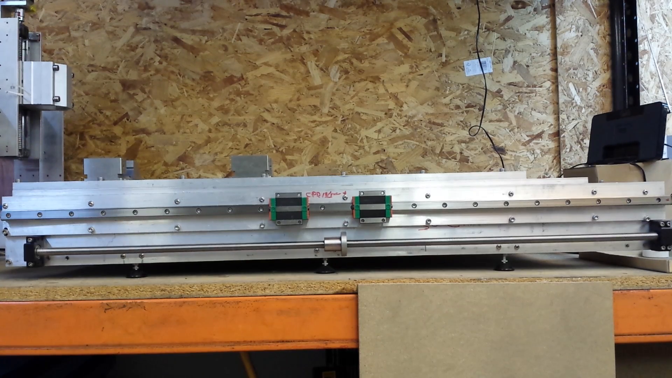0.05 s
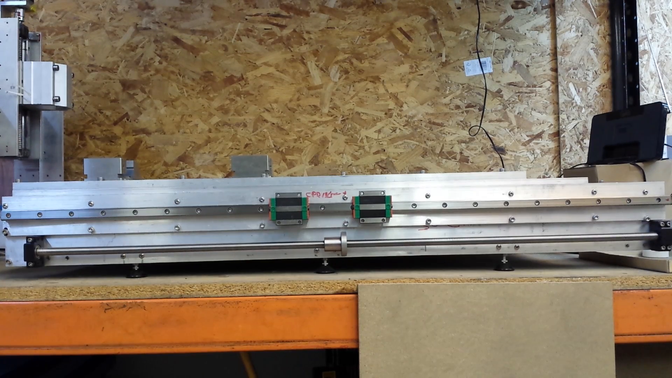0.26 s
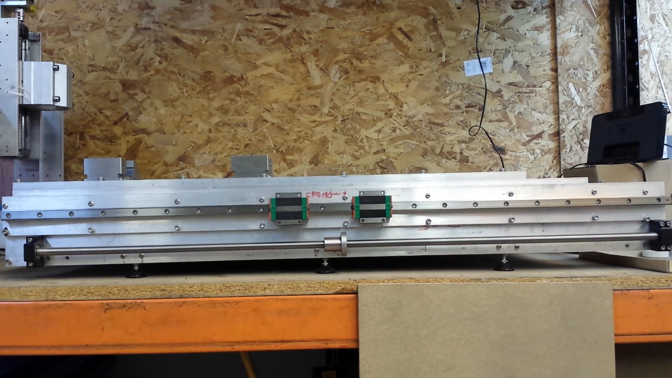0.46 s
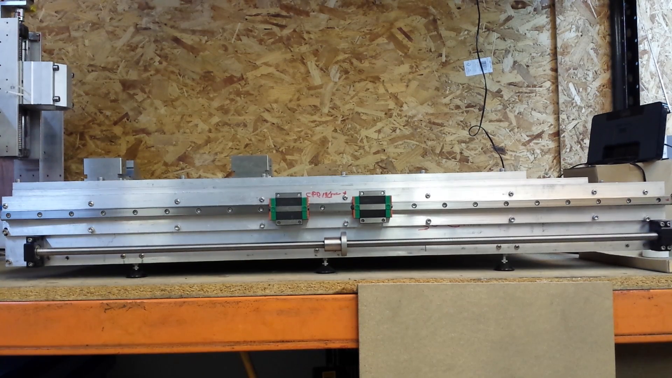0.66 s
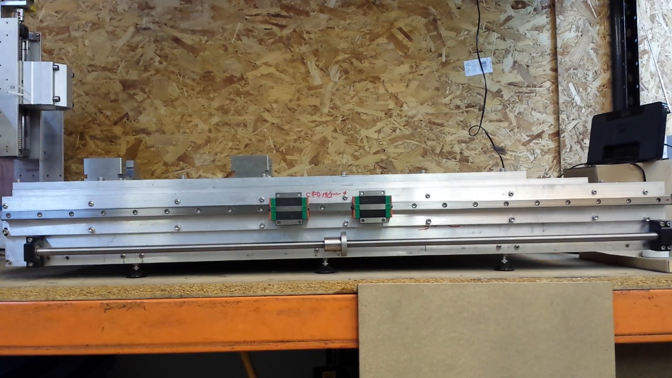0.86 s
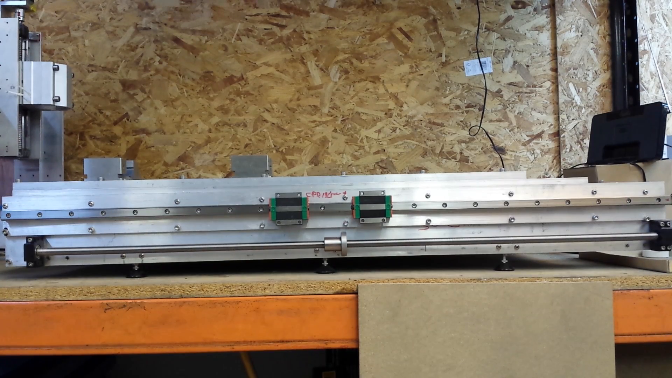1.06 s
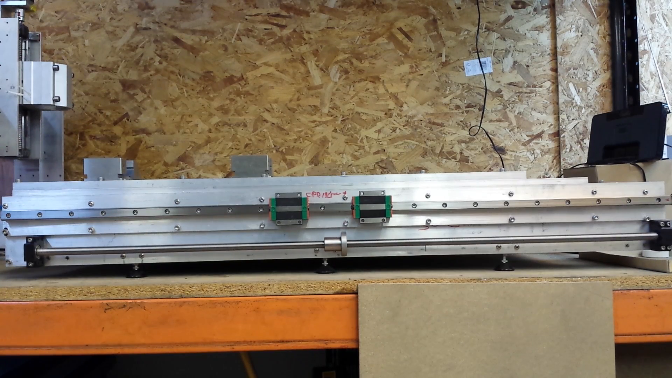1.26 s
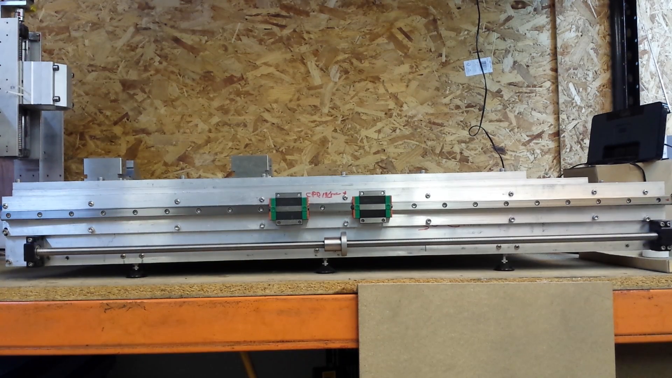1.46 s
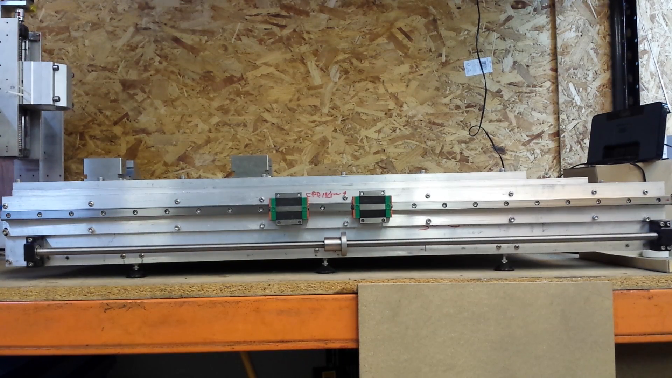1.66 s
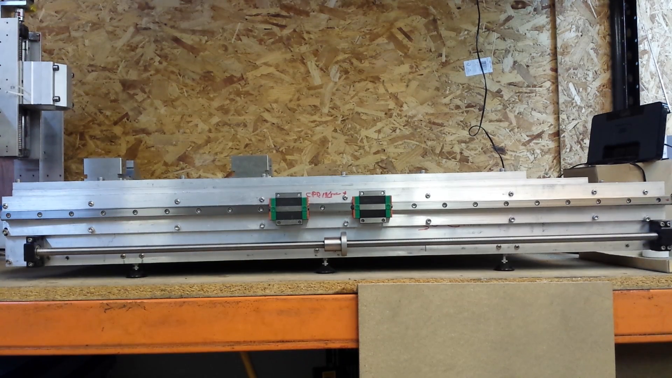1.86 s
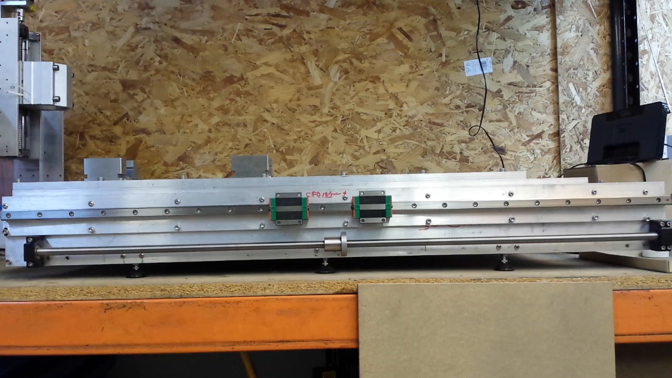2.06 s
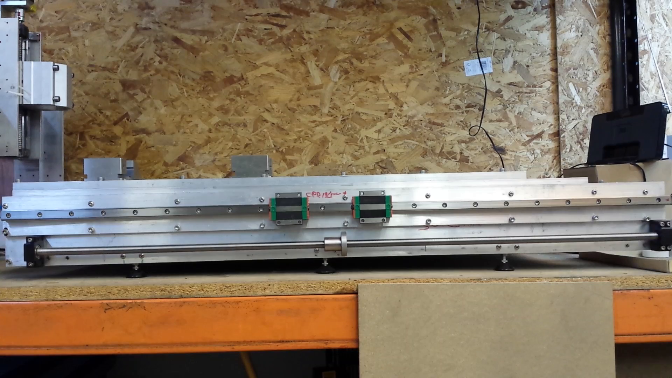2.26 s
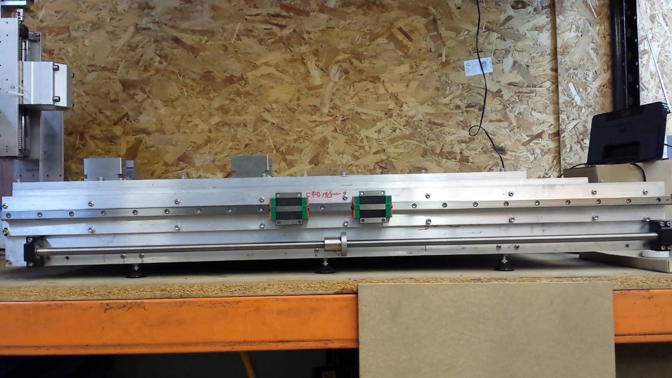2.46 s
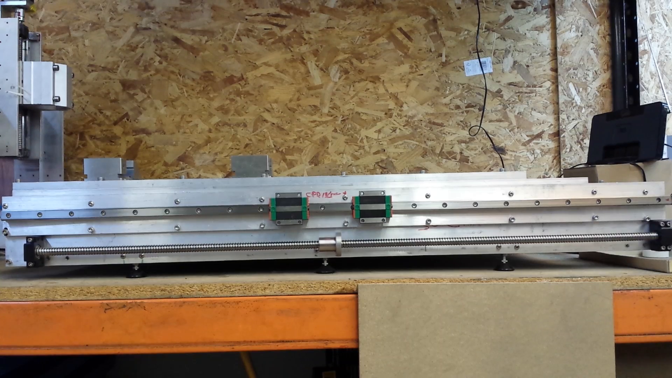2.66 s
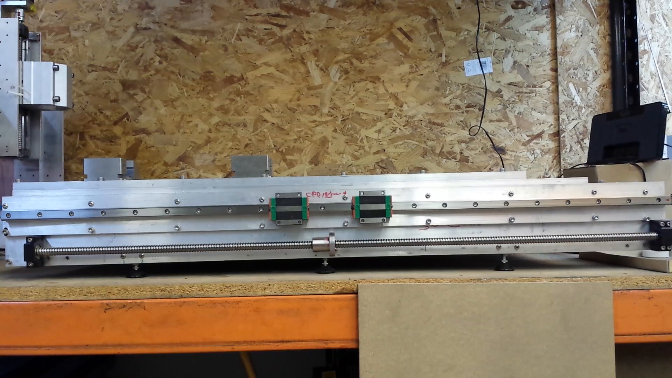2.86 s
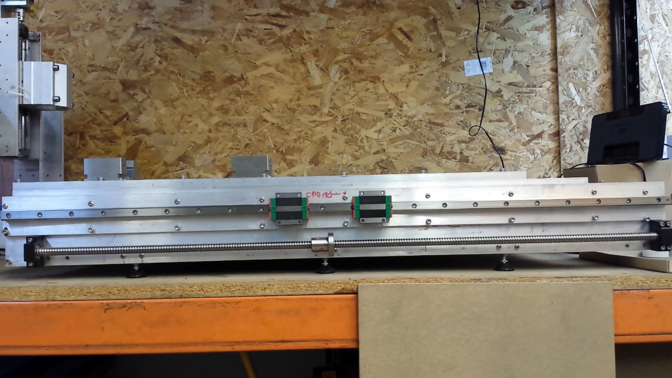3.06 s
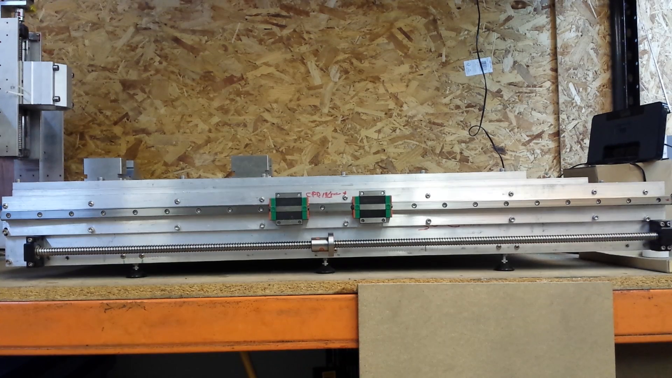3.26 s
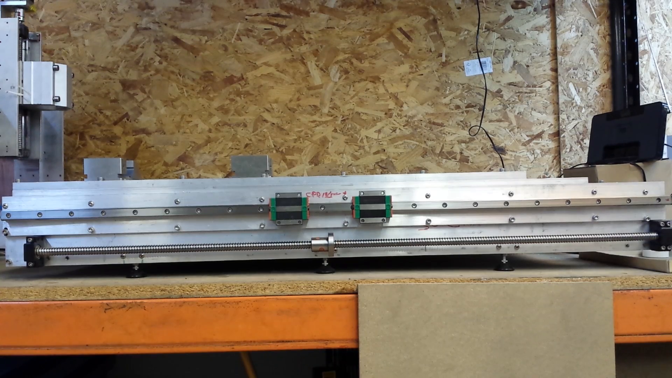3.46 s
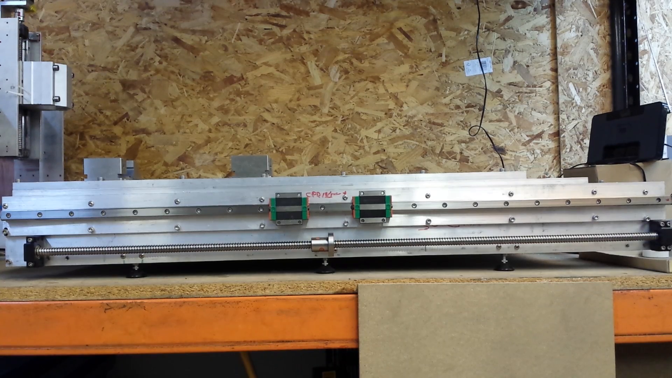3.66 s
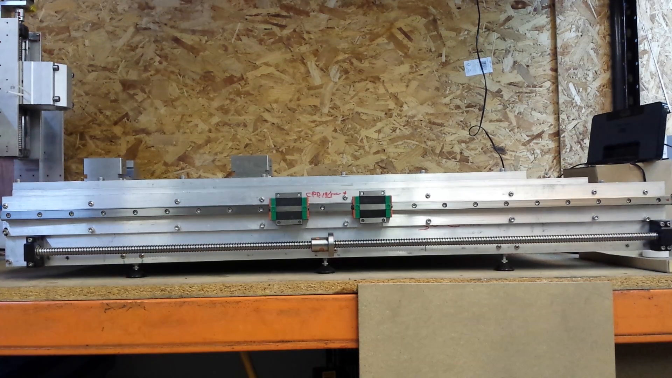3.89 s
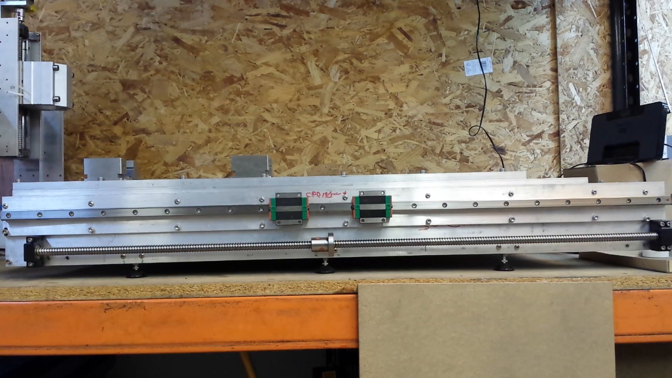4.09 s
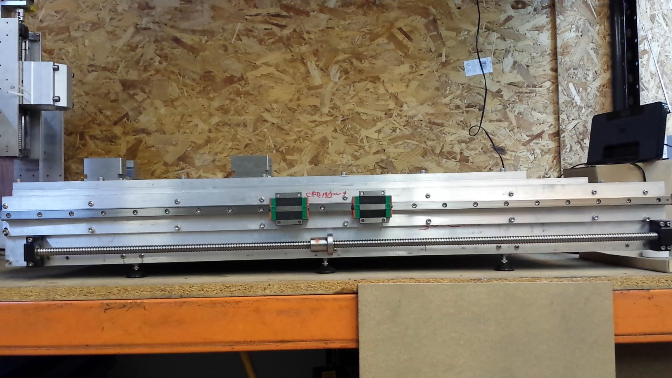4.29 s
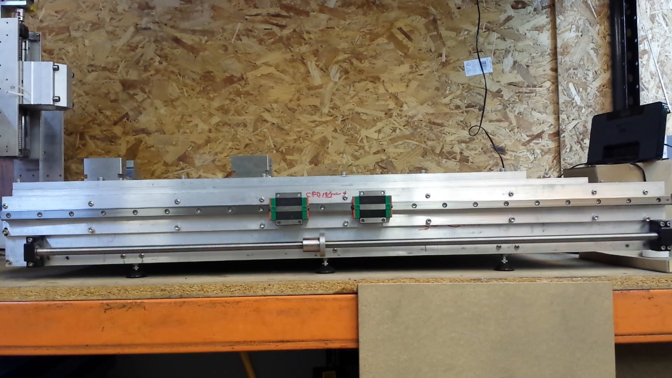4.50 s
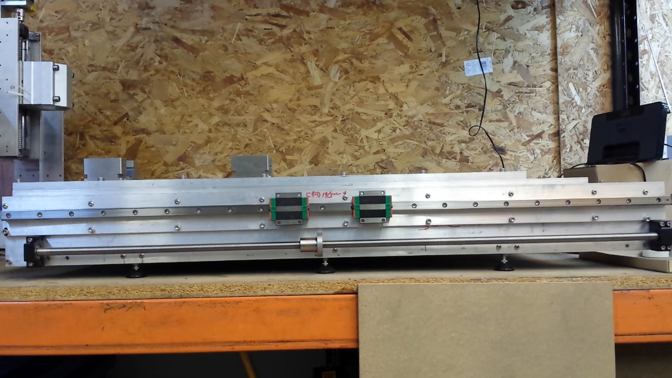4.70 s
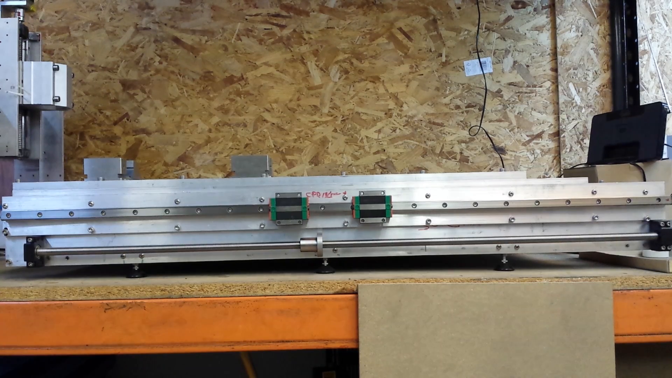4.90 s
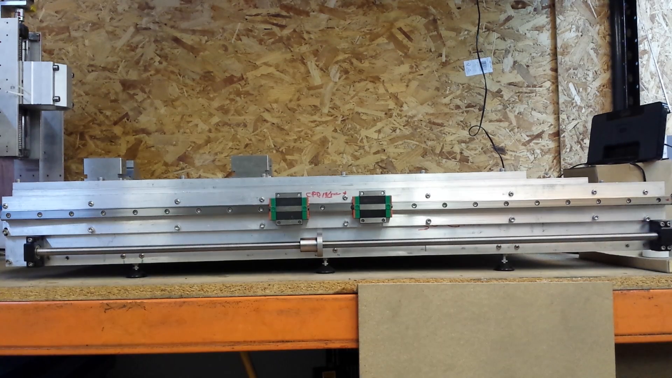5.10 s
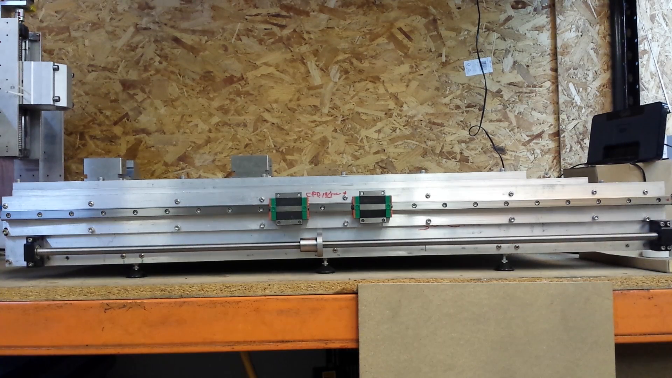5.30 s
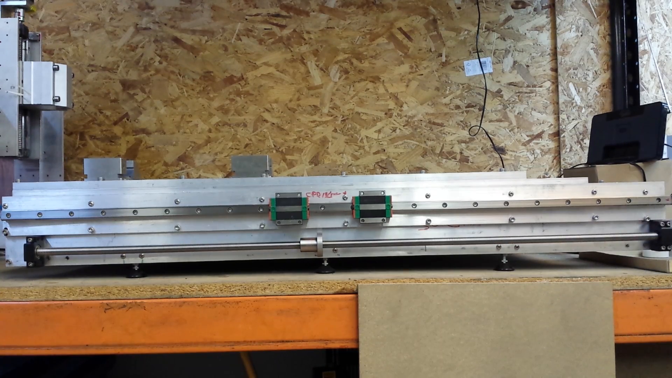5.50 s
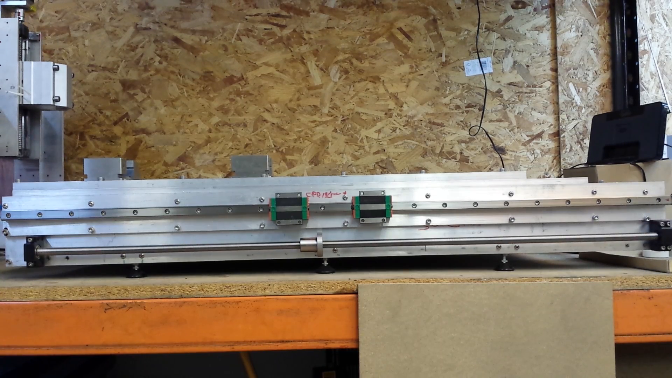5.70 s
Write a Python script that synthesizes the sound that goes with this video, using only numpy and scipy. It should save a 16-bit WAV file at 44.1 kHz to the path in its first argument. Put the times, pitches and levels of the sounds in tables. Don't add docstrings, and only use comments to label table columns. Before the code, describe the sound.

Close stereo sound of a stepper motor turning a long ball screw on an aluminium frame in a workshop. It begins already running, with a short opening jolt and unsettled wavering, then a steady whine around 1.7 and 3.4 kHz with fainter higher tones, a low screw hum, grainy metallic rumble and bearing hiss. Small knocks come near 0.33 and 0.6 s, with very faint regular coupling clicks. At 2.55 s it brakes: the pitch glides down fast through frame resonances, with a hard rattling jolt near 2.7 s and short ringing thuds until about 2.95 s. The rest holds only low shop noise, a faint boom and tiny ticks. At about 4.3 s it starts back with a stuttering shake, gliding up to full speed by 4.53 s. The whine wavers until about 4.86 s, stronger than before, then runs steadily with rumble and hiss to the end at about 5.75 s.

```python
import sys
import numpy as np
from scipy import signal
from scipy.fft import rfft, irfft, next_fast_len
from scipy.io import wavfile
from scipy.ndimage import uniform_filter1d

SR = 44100
rng = np.random.default_rng(int(sys.argv[2]) if len(sys.argv) > 2 else 0)


def ratio(d):
    e = np.asarray(d, float) / 20
    return 10 ** e


def to_wav(sig):
    pcm = np.clip(np.atleast_2d(sig), -1, 1) * 32767
    pcm = np.round(pcm).astype(np.int16)
    wavfile.write(sys.argv[1], SR, pcm.T)


N = 253164
T = np.arange(N) / SR

TURN_HZ = 33.528
REVERSE_S = 3.5


def in_time(rows):
    s, *columns = np.transpose(rows)
    return [np.interp(T, s, c) for c in columns]


def at_hz(points, hz):
    return np.interp(np.log(hz), np.log(np.array(points)[:, 0]), np.array(points)[:, 1])


def rms_one(x):
    return x / np.sqrt(np.mean(x ** 2) + 1e-20)


def resonate(x, hz, width):
    r = np.exp(-np.pi * width / SR)
    return signal.lfilter([1 - r], [1, -r * np.exp(2j * np.pi * hz / SR)], x)


def butter(x, order, hz, kind):
    return signal.sosfilt(signal.butter(order, hz, kind, fs=SR, output="sos"), x)


def swell_and_decay(late, db, rise, t60):
    return ratio(db + np.where(late < 0, 12 * late / rise, -60 * late / t60))


def banded_noise(spectrum, balance):
    # frequency in Hz, left-right likeness 0-1
    likeness = [(150, .99), (300, .92), (500, .8), (900, .4), (1500, .05), (14000, .01)]
    out = 0
    edges = 22 * 2 ** np.arange(0, 9.6, .5)
    sides = np.array([[1], [-1]])
    white = rng.standard_normal((2, 2, N))
    for k, (low, high) in enumerate(zip(edges, edges[1:])):
        mid, side = butter(white[k % 2], 2, [low, high], "band")
        hz = np.sqrt(low * high)
        alike = np.clip(at_hz(likeness, hz), 0, 1)
        pan = at_hz(balance, hz) / 2
        pair = np.sqrt(1 + alike) * mid + np.sqrt(1 - alike) * side * sides
        out = out + ratio(at_hz(spectrum, hz) + pan * sides) * pair
    return out


def shop_floor():
    # frequency in Hz, level in dB per Hz
    floor_spectrum = [(25, -19.5), (54, -18), (100, -9), (130, -15.5), (200, -13.5), (400, -26),
                      (600, -22.5), (800, -32), (1200, -19), (2000, -32), (2900, -38), (14000, -40.5)]
    # time in seconds, lift in dB
    floor_swell = [
        (0, 8.5),
        (3.3, 3),
        (3.6, -1),
        (3.9, -0.5),
        (4.2, 1.5),
        (4.5, 2.5),
    ]
    noise = rms_one(banded_noise(floor_spectrum, [(100, 3.5), (10000, -3.0)]))
    return ratio(-53 + in_time(floor_swell)[0]) * noise


def workshop(x):
    t60_s, wall_cut_hz = 0.87, 1060
    size = next_fast_len(N + SR)
    w = 2 * np.pi * np.arange(size // 2 + 1) / size
    t60 = t60_s / np.sqrt(1 + (w * SR / (2 * np.pi * wall_cut_hz)) ** 2)
    out = np.zeros((2, len(w)), complex)
    for k, lag in enumerate(rng.uniform(.02, .055, 16) * SR):
        loop = ratio(-60 * lag / SR / t60) * np.exp(-1j * w * lag)
        out[k % 2] += loop / (1 - loop) * (-1) ** (k // 2)
    return irfft(out * rfft(x, size), size)[:, :N]


def shaft_speed():
    # time in seconds, share of full speed
    speed_ramps = [
        (0, 1),
        (2.555, 1),
        (2.775, 0),
        (4.306, 0),
        (4.325, .08),
        (4.35, .15),
        (4.53, 1),
        (5.75, 1),
    ]
    return in_time(speed_ramps)[0]


def shaft_angle():
    # start in seconds, end in seconds, swing in rad at the full-step rate, power of the arch
    hunts = [
        (-.3, .27, 2.7, 1),
        (4.52, 4.86, 1.9, .5),
    ]
    hunt_hz = 69
    swing = 0
    for start, end, rad, power in hunts:
        through = np.clip((T - start) / (end - start), 0, 1)
        swing = swing + rad * np.abs(np.sin(np.pi * through)) ** power
    wander = .35 * rms_one(resonate(rng.standard_normal(N), 0, 40.0).real)
    angle = 2 * np.pi * TURN_HZ * np.cumsum(shaft_speed()) / SR
    return angle, swing / 200 * np.sin(2 * np.pi * hunt_hz * T + wander)


def rolling():
    return shaft_speed() ** (2 * 1.9)


def jolts():
    # peak in seconds, level in dB, rise in seconds, t60 in seconds
    jolt_rows = [(0.001, -6, .01, 1.04), (.34, -13.5, 0.024, 0.29), (0.598, -11, 0.021, 0.44),
                 (2.651, -4, 0.065, 0.31), (2.72, 5.5, 0.04, 0.85), (2.858, -1.5, 0.056, 0.4),
                 (3.0, -31, .1, 0.73), (4.36, -19, 0.0059, 1.6), (4.45, -5.5, 0.06, 0.59),
                 (4.528, 1, 0.092, 0.45), (4.629, -5, 0.027, 0.78)]
    return sum(swell_and_decay(T - s, db, rise, t60) ** 2 for s, db, rise, t60 in jolt_rows)


def bench_boom():
    # middle in seconds, level in dB, half length in seconds, pitch in Hz, width in Hz
    booms = [
        (3.15, -51, 0.21, 95, 24),
        (4.12, -54, 0.27, 98, 18),
        (5.62, -44.5, 0.14, 80, 55),
    ]
    wander_db = -3 * rms_one(resonate(rng.standard_normal(N), 0, 6.6).real)
    power = ratio(2 * (-55.5 + wander_db)) * shaft_speed()
    white = rng.standard_normal(N)
    out = np.sqrt(power) * rms_one(butter(white, 4, [56, 130], "band"))
    for s, db, half, hz, width in booms:
        band = rms_one(butter(white, 2, [hz - width / 2, hz + width / 2], "band"))
        out += ratio(db) * np.exp(-((T - s) / half) ** 2 / 2) * band
    return out


def dipped(hiss):
    # pitch in Hz, width in Hz, depth 0-1 on the way out, depth 0-1 on the way back
    dips = [(5780, 350, .6, .5), (7700, 900, .5, .5), (8900, 500, 0, .5), (9550, 350, .6, .6),
            (10300, 500, 0, .4), (11200, 600, .65, .85), (11750, 300, .4, .5)]
    speed = shaft_speed()
    for hz, width, out, back in dips:
        depth = speed * np.where(T > REVERSE_S, back, out)
        hiss = hiss - depth * signal.lfilter(*signal.iirpeak(hz, hz / width, fs=SR), hiss)
    return hiss


def bearing_hiss(jolt):
    # frequency in Hz, level in dB per Hz
    hiss_spectrum = [(150, -4), (300, 9), (800, 6), (1500, 11.5), (2800, 3.5), (4200, 4), (5600, 6),
                     (7600, 3), (10000, -4.5), (12600, -9), (14500, -11.5)]
    # frequency in Hz, left-right balance in dB
    hiss_balance = [(200, 1), (2200, -14.5), (5000, 4.5), (9000, -14.5), (13000, -26)]
    speed_db, jolt_db, still_share = -51.5, -42, 0.33
    power = ratio(2 * speed_db) * rolling() + ratio(2 * jolt_db) * jolt * (still_share + shaft_speed())
    hiss = np.sqrt(power) * banded_noise(hiss_spectrum, hiss_balance)
    return butter(dipped(hiss), 6, 13000, "low")


def whistles():
    # pitch in Hz, left level in dB, right level in dB
    whistle_rows = [(5968, -64, -71), (6804, -67, -76), (7100, -74, -73), (7550, -74, -80),
                    (7644, -73, -67), (7745, -73, -76), (9320, -77, -75), (11391, -73, -83),
                    (11488, -84, -70), (12150, -80, -73), (12380, -81, -73), (12672, -80, -66),
                    (14099, -92, -81)]
    out = np.zeros((2, N))
    white = rng.standard_normal(N)
    for hz, left_db, right_db in whistle_rows:
        whistle = rms_one(resonate(resonate(white, hz, 12), hz, 12).real)
        out += ratio(np.array([[left_db], [right_db]])) * whistle
    return out * shaft_speed() ** 20


def ticks():
    # start in seconds, level in dB, pitch in Hz, t60 in seconds
    tick_rows = [(0.331, -31, 1200, 0.15), (.597, -32, 1150, 0.18), (.596, -38, 2500, .12),
                 (.335, -31.5, 2200, 0.23), (2.647, -34, 8300, 0.043), (2.716, -25, 4900, 0.035),
                 (2.718, -20.5, 2800, 0.084), (2.757, -44, 8000, .03), (2.774, -33.5, 8900, 0.071),
                 (2.858, -29, 1200, 0.045), (3.04, -50, 6520, 0.047), (3.26, -51, 6300, 0.035),
                 (3.8, -47, 5700, 0.0056), (3.7, -64, 6500, 0.025), (4.038, -53, 6300, .03),
                 (.18, -36, 1700, .04), (2.735, -26, 3700, 0.044), (2.682, -32, 8900, .04)]
    length = 4000
    out = np.zeros(N)
    for s, db, hz, t60 in tick_rows:
        burst = rng.standard_normal(length) * ratio(-60 * np.arange(length) / SR / t60)
        width = .45 * hz if hz > 1000 else 70
        burst = resonate(resonate(burst, hz, width), hz, width).real * np.hanning(2 * length)[length:]
        out[int(s * SR):int(s * SR) + length] += ratio(db) * burst / np.abs(burst).max()
    return out * ratio(np.array([[-2.5], [2.5]]))


def coupling_tick(angle, tick_db, again_db):
    clicks = np.zeros(N)
    for offset, db in ((.32, tick_db), (.72, again_db)):
        at = np.flatnonzero(np.diff(np.floor(angle / (2 * np.pi) - offset)) > 0)
        at = at[at < 2.57 * SR]
        clicks[at] = ratio(db + rng.normal(0, 1.8, len(at)))
    ring = sum(resonate(clicks, hz, 380.0).real for hz in (8700, 9500, 10700))
    return rms_one(ring) * ratio(tick_db) * ratio(np.array([[-3.0], [1.5]]))


def rings():
    # peak in seconds, level in dB, pitch in Hz, rise in seconds, t60 in seconds
    ring_rows = [(.008, -30.5, 606, 0.033, 0.04), (.015, -35, 414, .02, 0.23),
                 (2.697, -32, 2280, .008, 0.089), (2.704, -35, 1140, .008, .1),
                 (2.72, -22, 595, 0.044, 0.089), (2.714, -26, 1740, .012, .07),
                 (2.79, -29.5, 906, .02, 0.2), (2.722, -26, 1535, 0.011, 0.08),
                 (2.726, -23.5, 1118, .014, 0.15), (2.735, -30, 480, 0.01, 0.1),
                 (2.757, -35, 1110, .008, .08), (2.77, -24.5, 602, 0.014, 0.092),
                 (2.78, -30, 190, 0.014, 0.072), (2.806, -31, 192, .01, .08), (2.846, -32, 199, .012, 0.07),
                 (2.93, -36, 201, .012, .08), (2.958, -35, 190, .012, .08), (2.812, -31, 1177, .01, 0.14),
                 (2.862, -30, 1180, .012, 0.11), (2.866, -26, 466, 0.017, 0.075),
                 (2.889, -41, 604, 0.011, 0.081), (2.897, -31, 1183, 0.011, 0.14),
                 (4.334, -31.5, 589.3, 0.0066, 0.5), (4.329, -37, 200, .006, .08),
                 (4.353, -32.5, 240, .008, 0.054), (4.375, -29, 240, 0.0074, 0.063),
                 (4.392, -37, 218, .007, .06), (4.412, -32, 230, 0.0068, .07),
                 (4.437, -30, 199, 0.015, 0.074), (4.45, -31, 630, .01, .06),
                 (4.555, -28, 507, 0.0085, .06), (4.363, -37, 1073, .012, 0.17),
                 (4.41, -18, 598, 0.0089, 0.061), (4.462, -21.5, 1125, 0.007, 0.09),
                 (4.5, -27.5, 1147, .03, .12), (4.496, -29.5, 600, 0.015, 0.18),
                 (4.534, -24.5, 1130, .008, .08), (4.534, -38, 600, 0.0089, 0.087),
                 (4.566, -27.5, 1750, .02, 0.11), (5.265, -33.5, 600, 0.082, 0.22)]
    out = np.zeros((2, N))
    for s, db, hz, rise, t60 in ring_rows:
        span = slice(max(int((s - 4 * rise) * SR), 0), int((s + t60) * SR))
        late = T[span] - s
        phase = rng.uniform(0, 2 * np.pi) + np.array([[.5 * (hz > 900)], [0]])
        out[:, span] += swell_and_decay(late, db, rise, t60) * np.cos(2 * np.pi * hz * late + phase)
    return out


def tooth_ripple(angle, rough_db, jitter_rad):
    # start in seconds, end in seconds, fade in and fade out in seconds, unevenness factor
    ramps = [
        (2.55, 2.802, 0.023, 0.087, 1.1),
        (4.318, 4.534, 0.03, 0.022, .75),
    ]
    ripple_orders = (50, 100, 150, 200, 250, 300)
    # braking dB and starting dB into the frame, braking dB and starting dB to the air
    ripple_levels = [(33, 34, -35, -36), (26, 25, -42, -41), (19, 18, -43, -46), (24, 37, -46, -41),
                     (8, -5, -56, -70), (0, -5, -63, -70)]
    # delay in seconds, share
    echoes = [(0, .8), (.0057, .5), (.0113, -.42), (.0181, .33), (.027, -.25), (.038, .18)]
    share = sum(np.clip(np.minimum((T - start) / rise, (end - T) / fall), 0, 1)
                for start, end, rise, fall, _ in ramps)
    busy = share > 0
    starting = T[busy] > REVERSE_S
    unevenness = np.where(starting, ramps[1][-1], ramps[0][-1])
    shake, air = np.zeros((2, N))
    for k, (brake_db, start_db, brake_air_db, start_air_db) in zip(ripple_orders, ripple_levels):
        slow = resonate(resonate(rng.standard_normal((2, busy.sum())), 0, 230), 0, 230).real
        uneven = unevenness * rms_one(slow)
        wave = share[busy] * ratio(rough_db * uneven[0]) * np.cos(k * angle[busy] + jitter_rad * uneven[1])
        shake[busy] += ratio(np.where(starting, start_db, brake_db)) * wave
        air[busy] += ratio(np.where(starting, start_air_db, brake_air_db)) * wave
    air = sum(part * np.roll(air, int(late * SR)) for late, part in echoes)
    stiff = butter(np.array([shake, air]), 3, 530, "high")
    return butter(stiff, 2, [480, 1040], "bandstop")


def frame(jolt, shake):
    # pitch in Hz, width in Hz, level in dB per Hz on the way out,
    # on the way back and when shaken, right-left level in dB, left lead in rad
    bench_modes = [(92.6, 8, -61.5, -67, -58, 0, 6), (152.8, 14, -69.5, -62, -60.5, -0.5, 3),
                   (192.1, 10.5, -62.5, -61.5, -56.5, -0.5, -1), (348, 72, -70.5, -67.5, -64.5, -3, 0),
                   (454.3, 44, -76, -67, -55.5, -2.5, 0.04), (491.4, 22.6, -64.5, -75, -58, 0, -0.5),
                   (591, 25.3, -60, -61, -54, 0, -0.4), (685.7, 38, -68, -82, -56, -2, 0.5),
                   (926, 57, -73.5, -77.5, -59.5, -4, -0.7), (1071, 36, -74.5, -81, -61, 5, 0.5),
                   (1119.4, 40, -68, -72, -57, -2.5, 0.5), (1198, 66, -68, -76, -58.5, -5.5, -1)]
    frame_modes = [(1282, 9.7, -58, -52, -58.5, -0.5, -1.63), (1377, 79, -70.5, -68, -65, 0.5, -1.04),
                   (1545, 42.5, -57.5, -52, -59.5, -2.5, 2), (1672, 26, -58.5, -82, -79, -6.5, 5),
                   (1731.7, 18.5, -51, -47, -75, -6, 1.4), (1763, 48, -58.5, -56, -61, -26, -7),
                   (1859, 38, -68.5, -67, -69.5, 5, 1), (2047, 126, -72, -72.5, -66, 1, 1.65),
                   (2209, 19.6, -65, -66, -56.5, -18, 1.2), (2330, 81, -78, -78, -67, -5.5, 0.2),
                   (2504, 107, -71, -75.5, -62.5, -4.5, 1.5), (2734, 270, -77.5, -78, -70, -22, 5.5),
                   (3304, 285, -71.5, -69, -67.5, 0, 2.5), (3860, 200, -85, -95, -72.5, -4, 1.5)]
    screw_mode = (258, 63, -77, -74.5, -61.5, -2.5, 1.5)
    roll_out_db, roll_back_db, back_share = 0.5, 0.68, 0.79
    back, roll = T > REVERSE_S, rolling()
    shaken = jolt / (jolt + .15 * roll + 1e-9)
    sizes = ratio(2.23 * rng.exponential(1, (3, N))) * rng.choice([-1, 1], (3, N))
    hits = rng.random((3, N)) < (3000 - 2200 * shaken) / SR
    balls = rms_one(sizes * hits * (1 + shaken)) * np.sqrt(SR / 2)
    out = np.zeros((2, N))
    for k, mode in enumerate([*bench_modes, *frame_modes, screw_mode]):
        hz, width, out_db, back_db, shaken_db, pan_db, lead = mode
        return_db = out_db + back_share * (back_db - out_db) + roll_back_db
        steady = np.where(back, ratio(2 * return_db), ratio(2 * (out_db + roll_out_db)))
        drive = np.sqrt(steady * roll + ratio(2 * shaken_db) * jolt) * balls[k % 3]
        drive += ratio(max(shaken_db, back_db - 11)) * shake
        ring = 2 * resonate(resonate(drive, hz, 1.6 * width), hz, 1.6 * width)
        turned = ring * np.exp(-1j * lead * min(hz / 500, 1) ** 2)
        out += [ring.real, ratio(pan_db) * turned.real]
    return out


def shaft_tones(hunting, tones, sing, runout_rad, second_rad):
    out = np.zeros((2, N))
    span = slice(int(sing[0][0] * SR), int(sing[-1][0] * SR))
    hum, whine = [c[span] for c in in_time(sing)]
    steady = 2 * np.pi * TURN_HZ * T[span]
    size = uniform_filter1d(np.abs(hunting[span]), size=1280)
    swell = 1 + 110 * (T[span] > REVERSE_S) * size
    hunts = size > 1e-5
    direct = hunting[span][hunts]
    echoed = np.roll(hunting, 210)[span][hunts]
    for k, left_db, right_db, lead in tones:
        start = rng.uniform(0, 2 * np.pi)
        if k < 40:
            tone = hum * np.exp(1j * (start + k * steady))
        else:
            side = k - 50 * round(k / 50)
            start = 1.07 * abs(side) + runout_rad * side + second_rad * (abs(side) > 1)
            start -= np.angle(ratio(left_db) * np.exp(1j * lead) + ratio(right_db))
            tone = whine * (swell if k - side == 150 else 1) * np.exp(1j * (start + k * steady))
            swung = .6 * np.exp(1j * k * direct) + .4 * np.exp(1j * k * echoed)
            tone[hunts] *= swung * (1 + 35 * size[hunts])
        out[0, span] += np.sqrt(2) * ratio(left_db) * (tone * np.exp(1j * lead)).real
        out[1, span] += np.sqrt(2) * ratio(right_db) * tone.real
    return out


def shaft_song(hunting):
    # time in seconds, screw hum share, motor whine share
    sing_out = [
        (0, 0.05, 0.8),
        (.1, .15, .9),
        (.27, 1, 1),
        (2.555, 0.98, .99),
        (2.575, 0.9, 0.5),
        (2.605, 0.7, 0.08),
        (2.72, 0, 0),
    ]
    sing_back = [
        (4.52, 0.088, 0.5),
        (4.54, .1, 0.89),
        (4.62, 0.78, 1),
        (5.75, 1.3, .99),
    ]
    # multiple of the turning rate, dB out, dB back, right-left dB, left lead in rad
    hum = [(2, -49, -53, 0, -.1), (4, -50, -51, 0, 0), (5, -59, -66, -1, 0), (7, -37, -49, -1, 0),
           (9, -45, -63, -3, 1.1), (10, -63, -50, 5, -.2), (13, -55, -65, -3, -.1), (14, -56, -59, 3, .6),
           (15, -46, -57, -1, .3), (17, -55, -61, 1, -.3), (18, -60, -50, 0, -.1), (20, -64, -57, -3, -.3)]
    # multiple, left level in dB, right level in dB, left lead in rad
    whine_out = [(47, -54, -51, 1.9), (48, -54, -56, 2.3), (49, -44, -51, 2.6), (50, -41, -46, -2.3),
                 (55, -48, -48, .8), (95, -57, -52, 2.1), (98, -65, -58, 2.6), (152, -63, -66, 2.9),
                 (202, -71, -65, -2.5), (301, -76, -66, -1.3), (99, -47, -64, -2.1), (100, -50, -44, 0),
                 (101, -41, -43, 1.8), (102, -56, -50, 2.4), (149, -64, -64, -1.5), (150, -48, -48, -.6),
                 (151, -57, -56, .6), (198, -62, -67, 1.9), (199, -51, -53, 1), (200, -48, -46, -.3),
                 (201, -56, -63, 1.1), (250, -55, -57, 2.4), (300, -61, -60, -.7), (350, -82, -75, 1.1)]
    whine_back = [(48, -53, -56, -2.7), (49, -49, -49, 2.4), (50, -32, -33, -2.9), (55, -48, -50, .6),
                  (95, -59, -85, -1.2), (98, -64, -56, 1.2), (99, -47, -67, -2.7), (100, -35, -41, 2.3),
                  (101, -34, -45, 2.7), (102, -48, -52, -2.5), (105, -60, -62, 2.7), (148, -77, -66, -1.8),
                  (149, -63, -82, .1), (150, -51, -57, -3), (152, -67, -81, 1.1), (251, -72, -67, -1),
                  (301, -70, -72, -1.1), (151, -67, -57, -1.9), (198, -62, -58, 2.8), (199, -46, -53, 1.8),
                  (200, -42, -50, 1.8), (201, -48, -51, 1.9), (202, -61, -60, 2.7), (203, -56, -68, -3),
                  (250, -54, -55, -.3), (300, -68, -61, 2.8), (248, -73, -71, -.4), (249, -73, -71, .4),
                  (252, -76, -68, 1.6), (350, -91, -78, 1.9)]
    hum_out = [(k, db, db + pan_db, lead) for k, db, _, pan_db, lead in hum]
    hum_back = [(k, db, db + pan_db, lead) for k, _, db, pan_db, lead in hum]
    tones = shaft_tones(hunting, hum_out + whine_out, sing_out, runout_rad=.7, second_rad=3.5)
    return tones + shaft_tones(hunting, hum_back + whine_back, sing_back, runout_rad=-1.6, second_rad=.5)


def scene():
    angle, hunting = shaft_angle()
    jolt = jolts()
    shake, air = tooth_ripple(angle, rough_db=4.0, jitter_rad=1.05)
    ringing = rings()
    body = frame(jolt, shake) + air + ringing
    far = butter((body - 0.58 * ringing).mean(0), 4, 330, "high")
    background = shop_floor() + ratio(-15.5) * workshop(far) + bench_boom()
    small = coupling_tick(angle, tick_db=-63.5, again_db=-85) + ticks() + whistles()
    return background + bearing_hiss(jolt) + small + body + shaft_song(hunting)


def roll_off(x):
    return signal.sosfilt(signal.butter(12, 14630, fs=SR, output="sos"), x)


def record(dry):
    # start in seconds, end in seconds
    top_kept = [
        (0, .02),
        (.525, .56),
        (.735, .79),
        (1.19, 1.39),
        (1.45, 2.05),
        (2.08, 2.28),
        (2.32, 2.41),
        (2.49, 2.59),
        (2.64, 2.8),
        (2.9, 4.54),
    ]
    top_hz = 12850
    is_open = sum((T >= start) * (T < end) * 1. for start, end in top_kept)
    kept = uniform_filter1d(is_open, size=400)
    low = signal.sosfiltfilt(signal.ellip(8, .1, 30, top_hz, fs=SR, output="sos"), dry)
    tooth = ratio(-72) * np.sqrt(2) * (T > 4.87) * np.cos(2 * np.pi * 400 * TURN_HZ * T)
    whine = tooth * [[0], [1]]
    return roll_off(low + kept * (dry - low) + whine)


dry = scene()
out = record(dry)
to_wav(out)
```